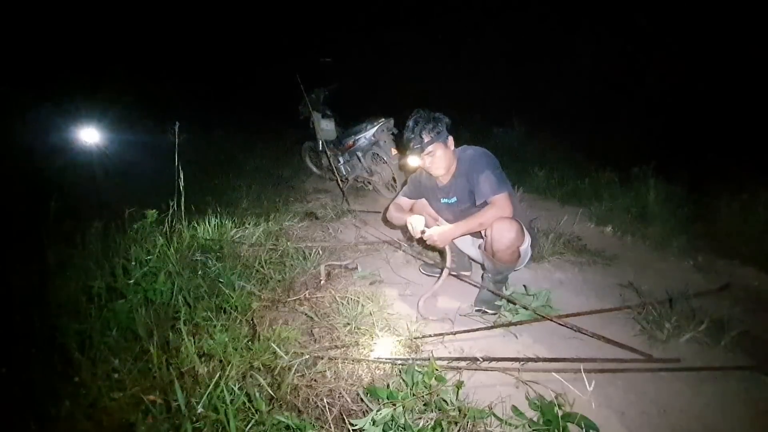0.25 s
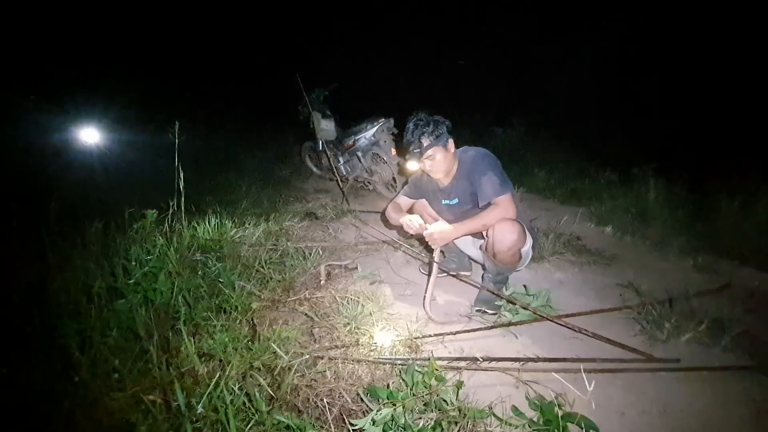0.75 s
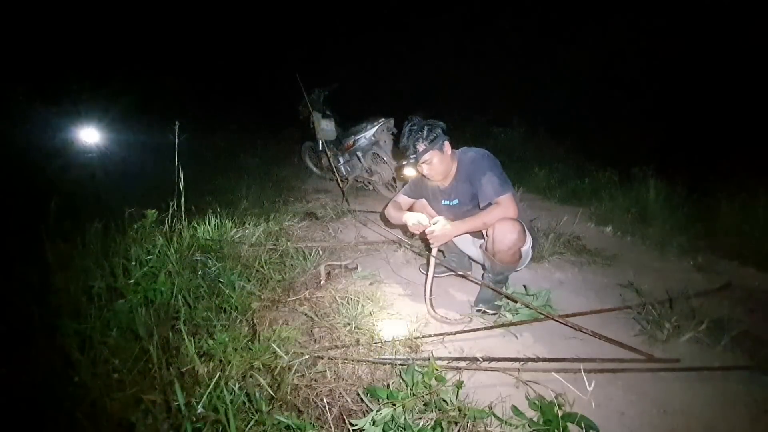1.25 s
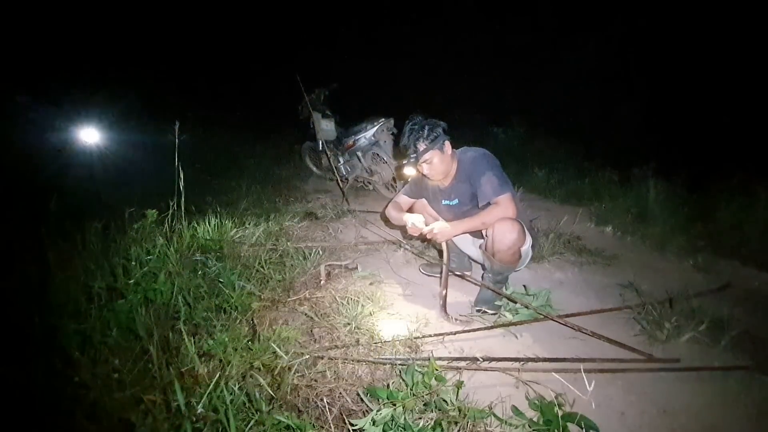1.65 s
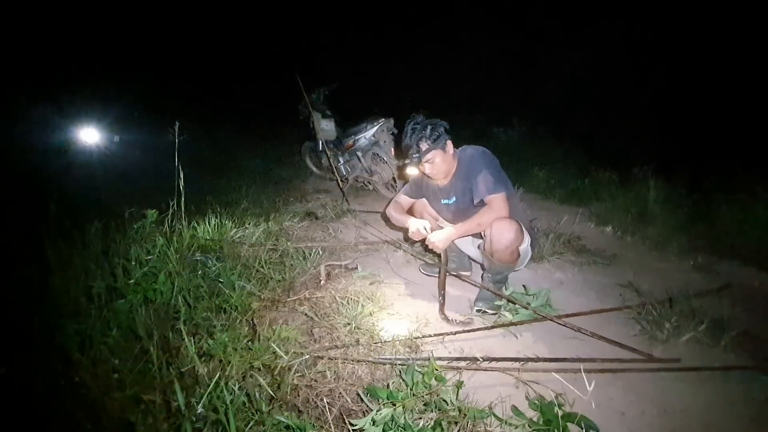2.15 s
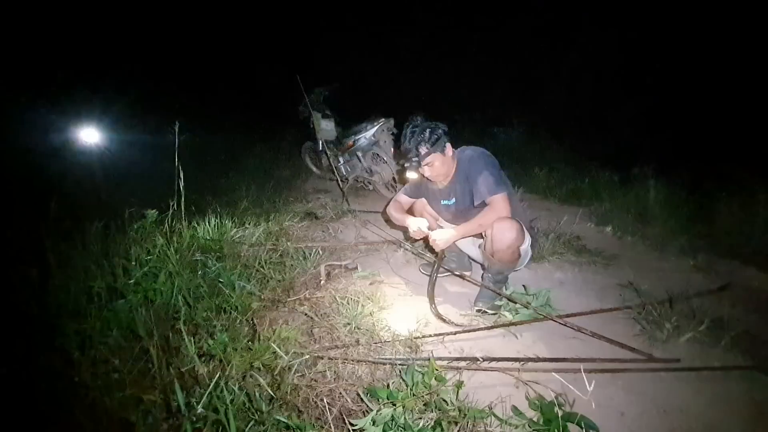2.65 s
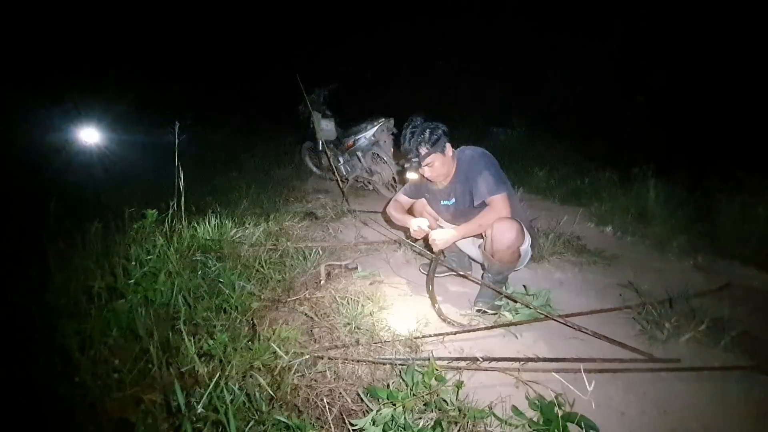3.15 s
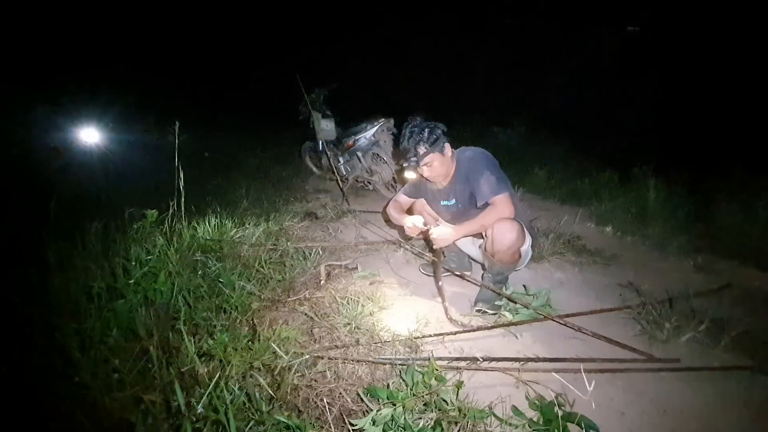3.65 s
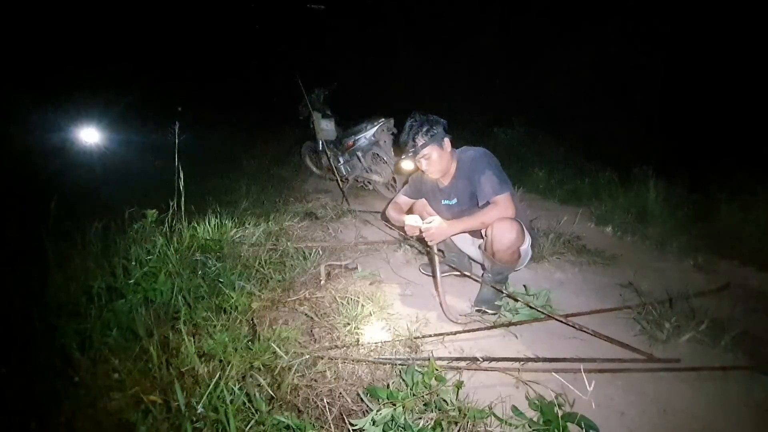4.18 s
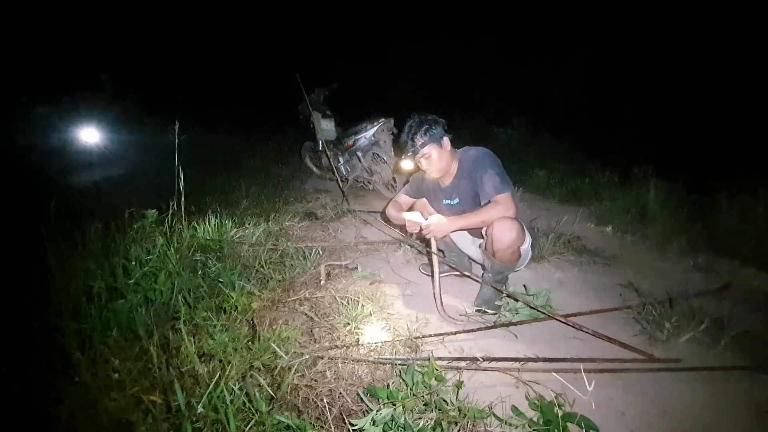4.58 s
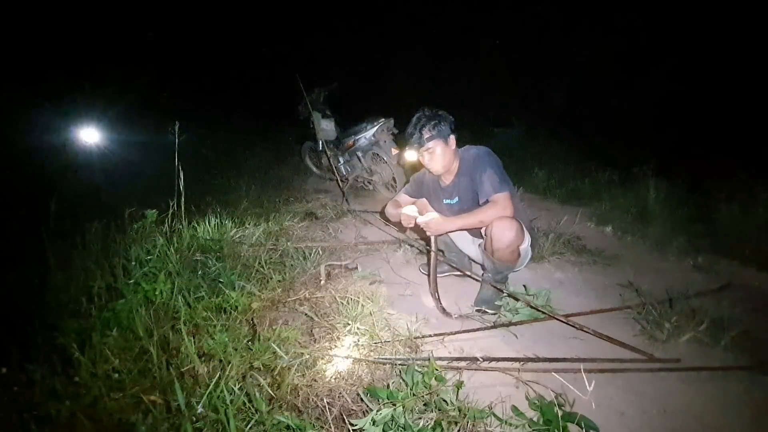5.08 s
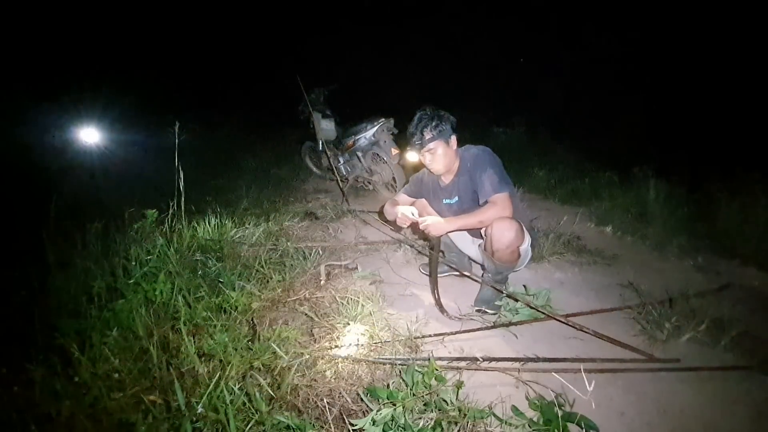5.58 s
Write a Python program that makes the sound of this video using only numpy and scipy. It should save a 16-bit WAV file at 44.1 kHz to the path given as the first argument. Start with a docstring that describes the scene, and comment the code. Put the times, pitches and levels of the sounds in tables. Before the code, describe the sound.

A night chorus fills all six seconds: fluttering field crickets around 3.5 to 4 kHz, higher tree and bush crickets, and very high throbbing katydids. A saw-like singer swells and stops abruptly about every 0.8 seconds; a lone cricket whistles short pulsed notes at 6.5 kHz, and faint brief buzzes recur. Ground singers pulse until about 3.4. Hoarse, rapid frog croaks at 2 to 3 kHz overlap until about 4.3, then thin out. Close handling gives a cluster of bright ticks, a rustle and soft thud at 0.2, a tick at 0.5, small clicks around 1.8 to 2.3, stronger ticks and crackle at 3.4 to 3.6, and light rustles after 5.2. From 3.9 to 4.35 a near cricket makes ten clean strokes, swelling to the loudest sound; a low soft thud falls beneath its end. Mono, with air hiss, faint rumble and a short diffuse tail.

```python
"""A swampy forest at night: crowds of crickets and katydids trill in several high bands, built from falling tones.
Frogs croak below them in hoarse pulsed tones, a lone cricket whistles and short buzzes come from rapid clicks.
Somebody crouching close by handles twigs and cord: ringing ticks, crackly noise rustles and low thuds.
One near cricket plays a short swelling chirp of clean strokes. The trees smear the far singers, over
a low rumble and soft air hiss made of filtered noise."""
import sys
import numpy as np
from scipy import signal
from scipy.fft import rfft, irfft
from scipy.io import wavfile
from scipy.ndimage import uniform_filter1d

SR = 44100
rng = np.random.default_rng(int(sys.argv[2]) if len(sys.argv) > 2 else 0)


def to_wav(sig):
    """Store sig (one row per channel, or 1-D mono) as 16-bit WAV at the path in sys.argv[1].

    Samples outside -1..1 are clipped; the rate is SR.
    """
    pcm = np.clip(np.atleast_2d(sig), -1, 1) * 32767
    pcm = np.round(pcm).astype(np.int16)
    wavfile.write(sys.argv[1], SR, pcm.T)  # frames by channels


N = 256662
T = np.arange(N) / SR  # time of every sample [s]


def db_to_gain(db):
    """Turn decibels into an amplitude factor."""
    return 10 ** (np.asarray(db) / 20)


def set_level(x, db):
    """Scale a sound so that its average (RMS) level is db."""
    return x * db_to_gain(db) / np.sqrt(np.mean(x ** 2))


def gain_curve(rows):
    """Gain along rows of (time [s], level [dB]); practically silent outside them."""
    s, db = np.transpose(rows)
    return db_to_gain(np.interp(T, s, db, left=-200, right=-200))


def band(x, hz, width_hz):
    """Keep only the frequencies around hz."""
    low = max(hz - width_hz / 2, 20)
    high = min(hz + width_hz / 2, .45 * SR)
    return signal.sosfilt(signal.butter(2, [low, high], "band", fs=SR, output="sos"), x)


def walk(rate):
    """Smooth random wander: random values held for 1 / rate seconds, then averaged twice."""
    hold = int(SR / rate)
    steps = np.repeat(rng.standard_normal(size=512), hold)[:N]
    return uniform_filter1d(uniform_filter1d(steps, hold), hold)


def add(out, s, sound):
    """Mix a sound in from time s; a time below zero counts as zero."""
    i = int(max(s, 0) * SR)
    out[i:i + len(sound)] += sound[:N - i]


def rasp(share, width_hz):
    """Roughness, as from uneven teeth: a gain near 1 that shakes at random."""
    low_pass = signal.butter(2, width_hz, fs=SR, output="sos")
    shake = signal.sosfilt(low_pass, rng.standard_normal(N))
    return 1 - share + share * set_level(shake, 0)


FOREST_T60_S = 0.57  # time for the tail to fall by 60 dB


def forest(x, wet):
    """Trunks and leaves scatter the sound into a short diffuse tail."""
    t = T[:SR // 2]
    fading_noise = rng.standard_normal(len(t)) * db_to_gain(-60 * t / FOREST_T60_S)
    tail = set_level(fading_noise, 0) / np.sqrt(len(t))
    wet = np.clip(wet, 0, 1)
    return np.sqrt(1 - wet) * x + np.sqrt(wet) * signal.fftconvolve(x, tail)[:N]


# Tone colour of the air hiss: (frequency [Hz], relative level per Hz [dB])
AIR_COLOUR = [(30, 3.5), (60, 21.5), (160, 14.5), (300, 8.5), (1000, -0.5), (1500, -2.5), (2400, -3),
              (3200, 15.5), (4300, 11), (5500, 13.5), (7650, 15), (9000, 17), (11400, 6), (12300, 4.5),
              (15000, 8)]
AIR_DB = -45.5  # before the slow wander
# Loudness of the low rumble: (time [s], level [dB])
RUMBLE_LEVEL = [(0.0, -56), (0.61, -59.5), (3.4, -58), (4.05, -56.5), (5.35, -60.5), (5.58, -58),
                (5.82, -58.5)]


def night_air():
    """Far chorus blurred to hiss (coloured noise), over a low noise rumble that swells and sinks."""
    hz = np.maximum(np.arange(N // 2 + 1) * SR / N, 1)
    colour_hz, colour_db = np.transpose(AIR_COLOUR)
    colour = db_to_gain(np.interp(np.log(hz), np.log(colour_hz), colour_db, left=-20))
    noise = irfft(rfft(rng.standard_normal(N)) * colour, N)
    hiss = set_level(noise, AIR_DB) * db_to_gain(0.2 * walk(4.54))
    rumble = set_level(band(rng.standard_normal(N), 85.4, 57), 0) * gain_curve(RUMBLE_LEVEL)
    return hiss + rumble


def throb(rate, crest_s, depth_db):
    """A gain that swings up and down regularly, as when a crowd sings in step."""
    return db_to_gain(depth_db * np.cos(2 * np.pi * rate * (T - crest_s)))


# Bursts of the ground singers: (start time [s], level while held [dB])
GROUND_BURSTS = [(.4, -47.5), (.61, -49), (.835, -47.5), (1.07, -49), (1.3, -50), (1.54, -48), (1.77, -48),
                 (2.03, -51), (2.27, -49), (2.76, -49.5), (3.0, -50), (3.22, -50)]
BURST_ATTACK_S, BURST_HOLD_S, BURST_RELEASE_S = 0.019, 0.05, 0.11
BURST_FOOT_DB = 15  # how far below the held level a burst begins and ends


def bursts():
    """Gain of short bursts: attack, hold, release."""
    times = np.cumsum([0, BURST_ATTACK_S, BURST_HOLD_S, BURST_RELEASE_S])
    drops_db = BURST_FOOT_DB * np.array([1, 0, 0, 1])
    return sum(gain_curve(np.transpose([s + times, db - drops_db])) for s, db in GROUND_BURSTS)


# Phrases of the saw-like singer: one stop time [s] each
SAW_STOPS = [.075, .885, 1.71, 2.555, 3.35, 4.155, 5.0, 5.8]
SAW_DB, SAW_SWELL_DB = -50.5, 10  # full level; climb up to it
SAW_SWELL_S, SAW_HOLD_S = .235, .345


def phrases():
    """Gain that climbs to full, holds and stops dead."""
    gain = 0
    for stop in SAW_STOPS:
        full = stop - SAW_HOLD_S
        gain = gain + gain_curve([(full - SAW_SWELL_S, SAW_DB - SAW_SWELL_DB), (full, SAW_DB), (stop, SAW_DB)])
    return gain


PITCH_DRIFT = .004  # size of each singer's slow pitch wander, as a share of pitch


def crowd(song, gain, count, near_db=2.5):
    """Singers that scrape a wing file: each stroke is a tone falling in pitch, each singer has its own pace."""
    start_hz, end_hz, rate, share, sizes, paces, wet, rough, wing_hz = song
    out = 0
    singer_sizes = np.linspace(-1, 1, count + 2)[1:-1]
    for size, (pace, offset) in zip(singer_sizes, rng.standard_normal((count, 2))):
        strokes_per_s = rate * (1 + paces * (pace + walk(8)))
        # 0 to 1 while the stroke sounds, above 1 in the pause after it
        stroke = (np.cumsum(strokes_per_s) / SR + offset) % 1 / share
        shape = np.sin(np.pi * np.minimum(stroke, 1)) * rasp(rough, width_hz=0.031 * start_hz)
        detune = 1 + sizes * size + .01 * walk(60) + PITCH_DRIFT * walk(6)
        hz = (start_hz + (end_hz - start_hz) * stroke) * detune
        loudness = db_to_gain(near_db * walk(2.38))  # each singer's level wanders
        out = out + loudness * shape * np.sin(2 * np.pi * np.cumsum(hz) / SR)
    # the wing membrane hardly radiates above its resonance
    wing = signal.ellip(6, 1, 40, wing_hz, fs=SR, output="sos")
    return forest(set_level(signal.sosfilt(wing, out), 0) * gain, wet)


# Wing strokes of each crowd: (start pitch [Hz], end pitch [Hz], strokes [per s], sounding share [0-1],
# pitch spread [share], pace spread [share], wet share [0-1], roughness [0-1], top of wing's range [Hz])
FIELD_STROKES = (3980, 3500, 96, .9, .03, .15, .3, .4, 4040)
TREE_STROKES = (6450, 5900, 63, .65, .025, .04, 0.61, 0.57, 6980)
BUSH_STROKES = (7600, 6600, 98, .6, .03, .08, 0.8, .6, 7300)
GROUND_STROKES = (5150, 4750, 40, 0.98, .055, .05, 0.34, 0.97, 5300)
KATYDID_STROKES = (10200, 9000, 124, .6, .03, .035, 0.56, 0.57, 10080)
SAW_STROKES = (11100, 9900, 134, .6, .004, .008, .04, .2, 10950)
# Loudness of the field crickets before their throb: (time [s], level [dB])
FIELD_LEVEL = [(0.0, -37.5), (0.89, -35.5), (1.26, -39), (1.73, -36.5), (3.27, -35.5), (4.16, -38.5),
               (4.96, -34.5), (5.32, -36.5), (5.82, -32.5)]
# Throbs of a crowd in step: (rate [per s], time of one crest [s], depth [dB])
FIELD_SWING = (24.1, 2.153, 2.6)
TREE_SWING = (1.285, 1.68, 1.3)
KATYDID_SWING = (7.68, 2.746, 3.9)
TREE_DB, BUSH_DB, KATYDID_DB = -45.5, -45, -48  # tree and katydid levels are before their throb


def insects():
    """Six kinds of wing-scraping singer; field crickets, tree crickets and katydids throb."""
    field = crowd(FIELD_STROKES, gain_curve(FIELD_LEVEL) * throb(*FIELD_SWING), count=6)
    tree = crowd(TREE_STROKES, db_to_gain(TREE_DB) * throb(*TREE_SWING), count=3)
    bush = crowd(BUSH_STROKES, db_to_gain(BUSH_DB), count=3)
    ground = crowd(GROUND_STROKES, bursts(), count=4)
    katydids = crowd(KATYDID_STROKES, db_to_gain(KATYDID_DB) * throb(*KATYDID_SWING), count=2, near_db=2.0)
    saw = crowd(SAW_STROKES, phrases(), count=1, near_db=-3)
    return field + tree + bush + ground + katydids + saw


WHISTLE_S, WHISTLE_EVERY_S, WHISTLE_LENGTH_S = .385, .712, .18  # one start, round, length
WHISTLE_HZ, WHISTLE_PULSE_HZ = 6500, 60
WHISTLE_DB = -48  # peak level before the pulsing


def whistler():
    """A lone cricket: a tone of steady pitch, pulsed, in short regular phrases."""
    u = np.minimum((T - WHISTLE_S) % WHISTLE_EVERY_S / WHISTLE_LENGTH_S, 1)
    phrase = np.sin(np.pi * u) ** .5
    pulses = 1 + .5 * np.cos(2 * np.pi * WHISTLE_PULSE_HZ * T)
    tone = np.sin(2 * np.pi * WHISTLE_HZ * T)
    return forest(db_to_gain(WHISTLE_DB) * phrase * pulses * tone, .3)


# Short buzzes: (start time [s], level at the middle [dB])
BUZZES = [(-.03, -58), (.88, -61), (1.86, -61), (2.78, -57), (3.47, -58), (4.26, -55), (4.96, -61),
          (5.66, -57)]
BUZZ_HZ, BUZZ_BODY_HZ, BUZZ_WIDTH_HZ = 356, 11400, 1800  # click rate, wing resonance, its width
BUZZ_S = .1  # length of each buzz


def buzzer():
    """Fast regular tooth clicks ringing a wide, high wing resonance: a comb of lines."""
    gate = np.zeros(N)
    for s, db in BUZZES:
        add(gate, s, db_to_gain(db) * np.hanning(int(BUZZ_S * SR)) ** .5)
    clicks = np.exp(40 * (np.cos(2 * np.pi * BUZZ_HZ * T) - 1) * 20)
    return gate * set_level(band(clicks, BUZZ_BODY_HZ, BUZZ_WIDTH_HZ), 0)


CROAK_PITCH_SPREAD = .012  # random pitch change from croak to croak, as a share of pitch


def frog(calls, hz, pulse_hz, fade_s, wet, rough):
    """Each croak scoops up to its pitch, then fades as a run of hoarse throat pulses."""
    out, t = np.zeros(N), T[:SR // 5]
    pulse = t * pulse_hz % 1
    # a quick rise at the start, and a larger rise within every pulse
    scoop = 1 - 0.0555 * np.exp(-t / 0.01095) + 0.079 * (pulse - .5)
    envelope = np.sin(np.pi * pulse) * np.exp(-(t / fade_s) ** 2)
    for (s, db), chance in zip(calls, rng.standard_normal((len(calls), 1))):
        pitch = hz * (1 + CROAK_PITCH_SPREAD * chance) * scoop
        tone = np.sin(2 * np.pi * np.cumsum(pitch) / SR)
        add(out, s - .01, db_to_gain(db) * envelope * tone)  # starts just before its listed time
    return forest(out * rasp(rough, width_hz=130), wet)


# Croaks of the two-toned frog: (time [s], upper tone level [dB], lower tone level [dB]), before fade and rasp
TWIN_CROAKS = [(.0306, -46, -57), (.135, -50, -53), (.3596, -39.5, -50), (.599, -44, -52),
               (.8191, -43, -55), (1.0793, -43, -51), (1.3403, -47, -56), (1.5377, -40.5, -55.5),
               (1.7, -43.5, -53), (1.878, -38.5, -46.5), (2.0338, -44.5, -55), (2.2112, -43, -53),
               (2.345, -44, -53), (2.5066, -43.5, -55), (2.65, -47, -55), (2.815, -43, -53),
               (2.9505, -46, -58), (3.09, -45, -50.5), (3.21, -55, -50.5), (3.355, -45, -54),
               (3.631, -44, -53), (3.752, -46, -56), (3.895, -46, -53.5), (4.03, -50, -56),
               (4.15, -48, -60), (4.2797, -43, -54)]
TWIN_UPPER_HZ, TWIN_LOWER_HZ, TWIN_LAG_S = 2835, 2106, .02
# Croaks of two other frogs: (time [s], level before fade and rasp [dB])
REED_CROAKS = [(0.5918, -47), (0.849, -50), (1.0996, -42.5), (1.3594, -43.5), (1.7125, -44.5),
               (2.0522, -44.5), (2.348, -41.5), (2.6035, -42), (2.962, -44), (3.2166, -40.5),
               (3.497, -37.5), (3.762, -42.5), (4.193, -49), (4.6, -50), (4.98, -48.5), (5.306, -50.5),
               (5.62, -49)]
LOW_CROAKS = [(0.155, -54), (0.383, -53), (0.5204, -52), (.75, -57), (0.8809, -54), (1.2136, -53),
              (1.5094, -55), (1.6778, -57), (1.8285, -56), (2.0062, -51)]
REED_FROG_HZ, LOW_FROG_HZ, LONE_CROAK_HZ = 3073, 1920, 2640


def frogs():
    """Four pulsed callers; one sounds two tones, the lower a little late."""
    upper_calls = [(s, db) for s, db, _ in TWIN_CROAKS]
    lower_calls = [(s + TWIN_LAG_S, db) for s, _, db in TWIN_CROAKS]
    upper = frog(upper_calls, TWIN_UPPER_HZ, pulse_hz=33, fade_s=.105, wet=.3, rough=.38)
    lower = frog(lower_calls, TWIN_LOWER_HZ, pulse_hz=40, fade_s=.07, wet=.3, rough=.35)
    reed = frog(REED_CROAKS, REED_FROG_HZ, pulse_hz=50, fade_s=.13, wet=.35, rough=.55)
    low = frog(LOW_CROAKS, LOW_FROG_HZ, pulse_hz=45, fade_s=.1, wet=.45, rough=.3)
    # a single croak: (time [s], level [dB])
    lone = frog([(4.655, -44.5)], LONE_CROAK_HZ, pulse_hz=40, fade_s=.06, wet=.25, rough=.9)
    return upper + lower + reed + low + lone


# Twig and cord ticks: (time [s], ring level [dB], ring pitch [Hz], crack level against the ring, before a 5 dB cut [dB])
TWIG_TICKS = [(.184, -47, 666, -16), (.197, -36.5, 643, -18), (0.199, -36, 2840, 0), (.219, -37.5, 730, -7),
              (.232, -36, 12000, 9), (0.245, -22, 11750, 0), (.3237, -43, 12000, 2),
              (0.5223, -28, 2990, -16), (1.0803, -48, 2630, 5), (1.7943, -41, 13900, -9),
              (1.891, -45, 1900, -12), (1.976, -45, 1570, -17), (2.288, -41, 1910, -15),
              (2.3, -38.5, 1860, -9), (2.654, -51, 1950, -1), (3.188, -41, 2080, -14),
              (3.4453, -27, 2770, -22), (3.47, -44, 2300, -4), (3.497, -28.5, 2690, -11),
              (3.59, -39, 2400, -6), (5.191, -44, 2270, 2), (5.26, -51.5, 2000, -2)]
RING_CYCLES, SHORTEST_RING_S, LONGEST_RING_S = 50, 0.0065, 0.035  # ring time to fall by 60 dB
# Rustles of grass and cloth: (time [s], length [s], level before the swell and fade [dB], centre [Hz])
GRASS_RUSTLES = [(0.173, 0.17, -62, 1520), (.18, 0.086, -55, 180), (1.868, 0.24, -63.5, 1920),
                 (2.27, 0.12, -48, 11000), (3.433, 0.33, -56, 2850), (3.415, 0.36, -66, 497),
                 (3.421, 0.21, -50, 13000), (3.701, 0.42, -61.5, 282), (4.645, 0.087, -64, 2660),
                 (5.182, 0.13, -56.5, 2450), (5.3, .08, -53, 11500), (5.595, .08, -53, 11500),
                 (5.611, 0.03, -70, 4900)]
# Soft thuds on the ground: (time [s], peak level [dB], length [s])
GROUND_THUDS = [(.19, -45, .065), (4.325, -43, .14)]
THUD_HZ = 90


def handling():
    """Ticks are a wide crack and a damped ring; rustles are crackly noise; thuds are short and low."""
    out, t = np.zeros(N), T[:SR // 10]
    for s, db, hz, crack_db in TWIG_TICKS:
        crack = set_level(band(rng.standard_normal(len(t)), hz, 1.3 * hz), -5)
        crack = crack * db_to_gain(crack_db - 60 * t / .012)
        ring_s = np.clip(RING_CYCLES / hz, SHORTEST_RING_S, LONGEST_RING_S)
        ring = db_to_gain(-60 * t / ring_s) * np.sin(2 * np.pi * hz * t)
        onset = np.minimum(t / .0005, 1)
        add(out, s, db_to_gain(db) * onset * (ring + crack))
    for s, length, db, hz in GRASS_RUSTLES:
        u = np.linspace(0, 1, int(length * SR))
        noise, grain = rng.standard_normal((2, SR // 2))
        crackly_noise = noise * db_to_gain(45 * uniform_filter1d(grain, size=64))
        crackle = band(crackly_noise, hz, 1.1 * hz)[:len(u)]
        add(out, s, set_level(crackle, db) * np.sin(np.pi * u ** 0.35))
    for s, db, length in GROUND_THUDS:
        thud_t = T[:int(length * SR)]
        envelope = np.hanning(len(thud_t)) ** .5
        add(out, s, db_to_gain(db) * envelope * np.sin(2 * np.pi * THUD_HZ * thud_t))
    return forest(out, .08)


# Strokes of the near cricket: (time of the middle [s], peak level [dB])
CHIRP_STROKES = [(3.897, -29.5), (3.94, -36), (3.983, -28), (4.032, -25.5), (4.082, -24), (4.134, -20.5),
                 (4.181, -20), (4.2305, -17), (4.280, -17), (4.332, -17)]
CHIRP_START_HZ = 3670
# a full stroke, and how a weaker one is shorter and drops less
FULL_STROKE_DB = -17
STROKE_S, STROKE_S_PER_DB, STROKE_DROP_HZ, DROP_HZ_PER_DB = .027, .0011, 340, 16.5


def near_cricket():
    """Clean strokes that swell, their pitch dropping ever faster as the wing slows."""
    out = np.zeros(N)
    for s, db in CHIRP_STROKES:
        weaker_db = FULL_STROKE_DB - db
        length = STROKE_S - STROKE_S_PER_DB * weaker_db
        u = np.linspace(0, 1, int(length * SR))
        drop_hz = STROKE_DROP_HZ - DROP_HZ_PER_DB * weaker_db
        hz = CHIRP_START_HZ - drop_hz * u ** 1.8
        swell = np.sin(np.pi * u ** 1.35) ** .65
        tone = np.sin(2 * np.pi * np.cumsum(hz) / SR)
        add(out, s - length / 2, db_to_gain(db) * swell * tone)
    return forest(out, 0.0038)


def scene():
    """Add up all the sources, as one channel."""
    return (night_air() + insects() + whistler() + buzzer() + frogs() + handling() + near_cricket())[None]


def record(dry):
    """The recorder cuts the top steeply, above 15500 Hz."""
    return signal.sosfilt(signal.ellip(14, .2, 70, 15500, fs=SR, output="sos"), dry)


dry = scene()
out = record(dry)
to_wav(out)
```